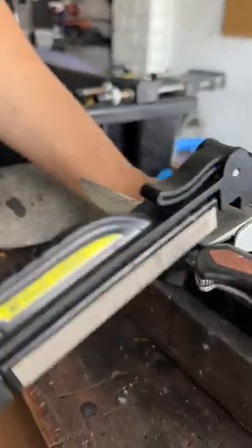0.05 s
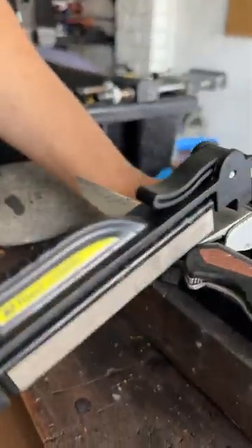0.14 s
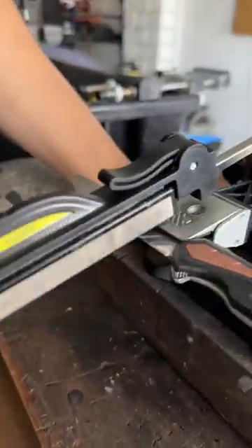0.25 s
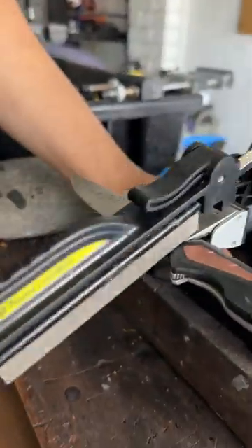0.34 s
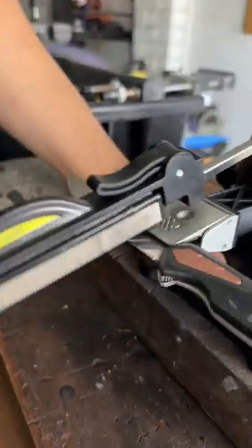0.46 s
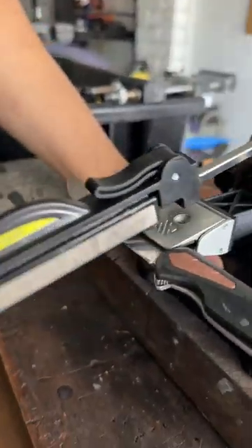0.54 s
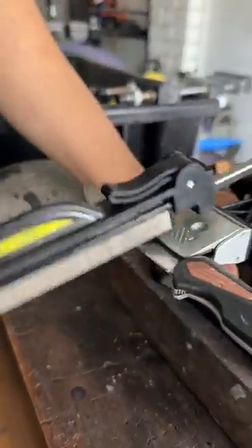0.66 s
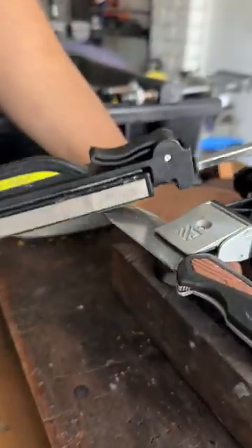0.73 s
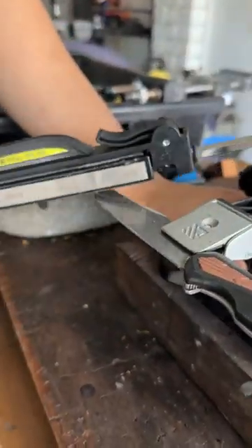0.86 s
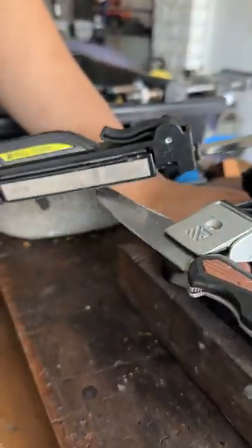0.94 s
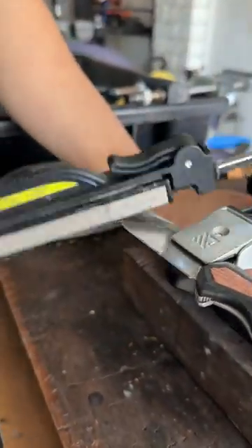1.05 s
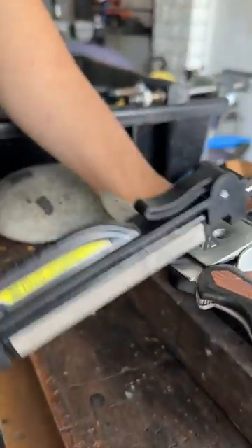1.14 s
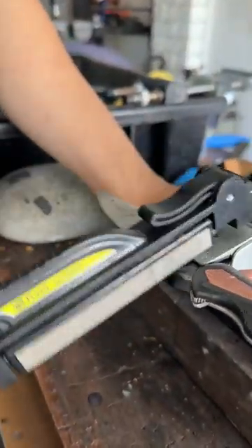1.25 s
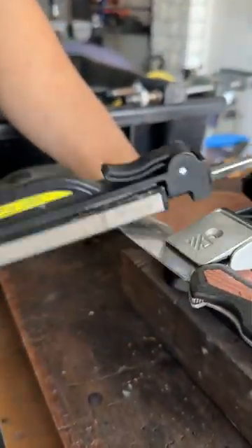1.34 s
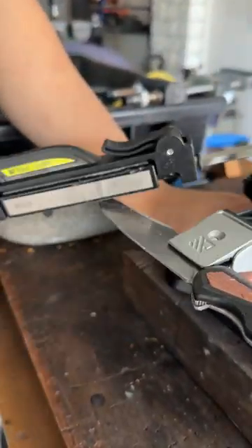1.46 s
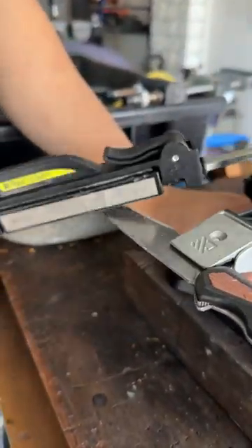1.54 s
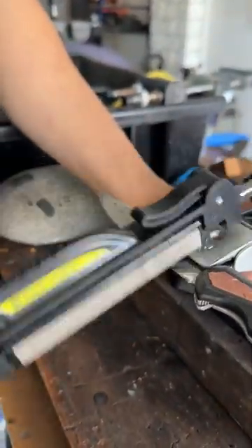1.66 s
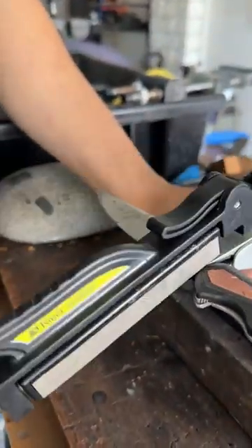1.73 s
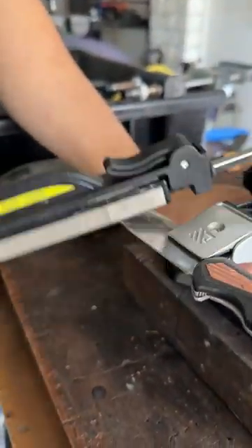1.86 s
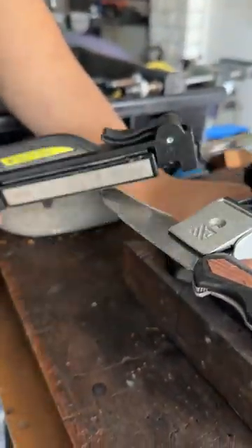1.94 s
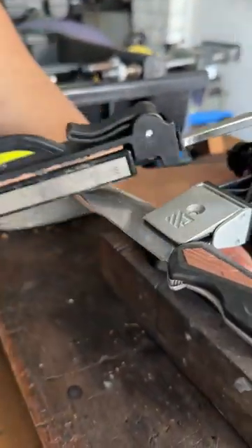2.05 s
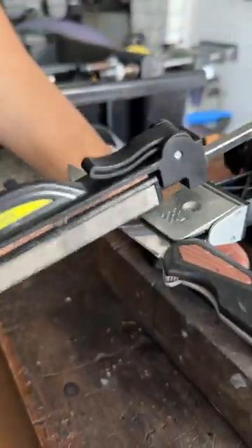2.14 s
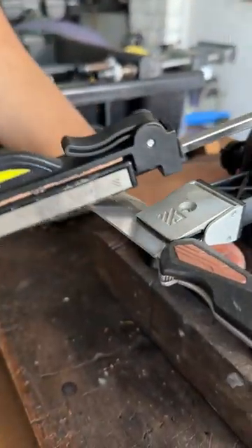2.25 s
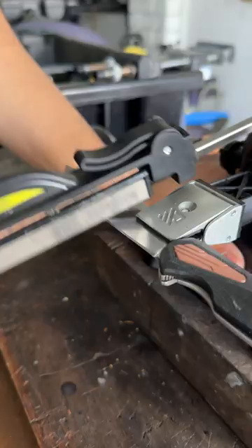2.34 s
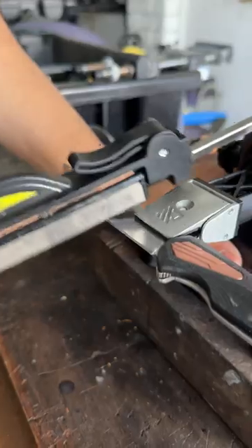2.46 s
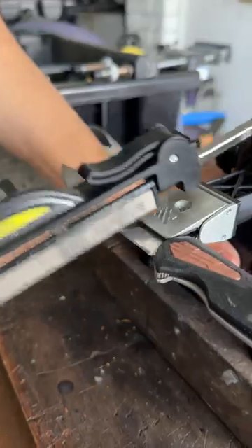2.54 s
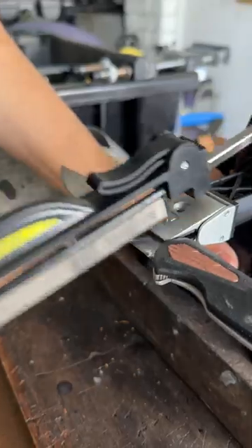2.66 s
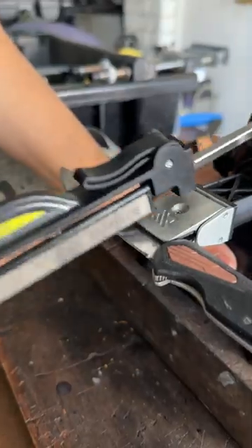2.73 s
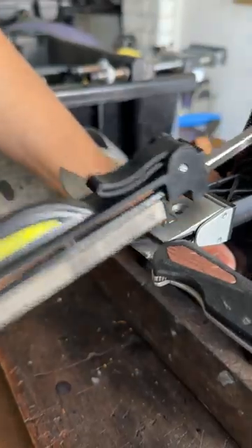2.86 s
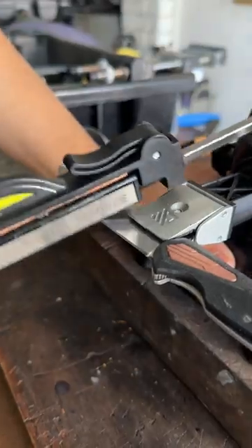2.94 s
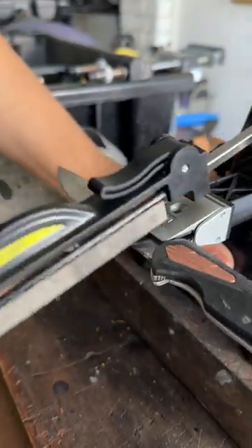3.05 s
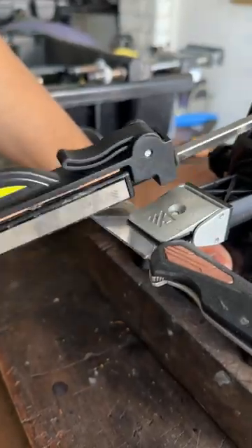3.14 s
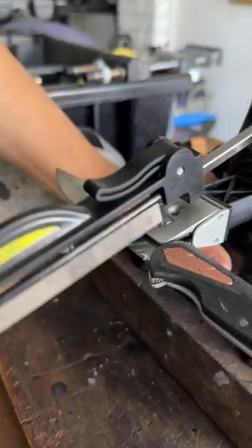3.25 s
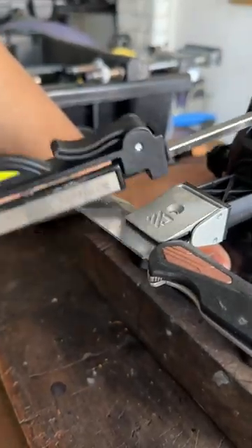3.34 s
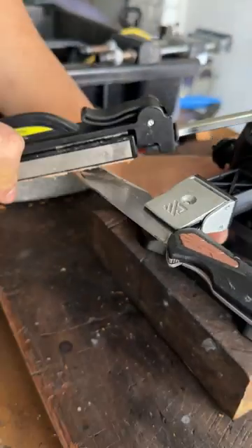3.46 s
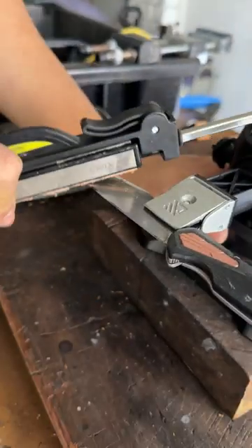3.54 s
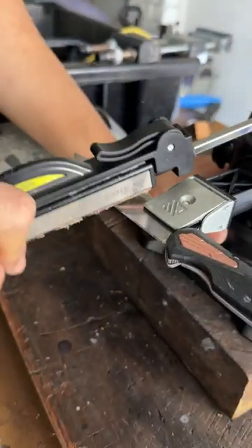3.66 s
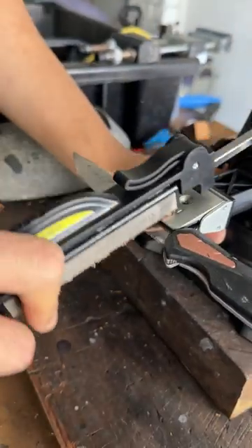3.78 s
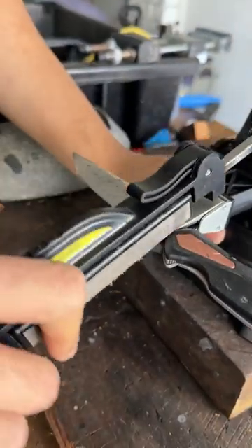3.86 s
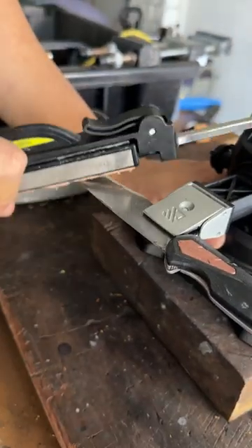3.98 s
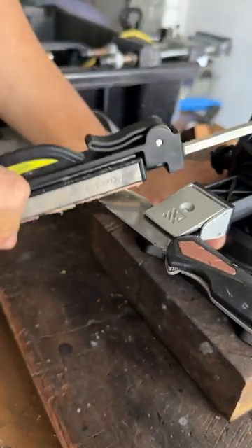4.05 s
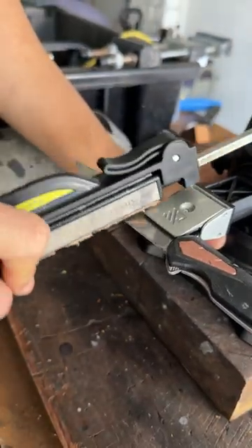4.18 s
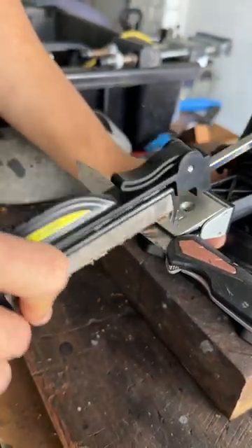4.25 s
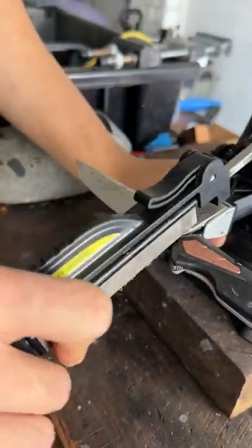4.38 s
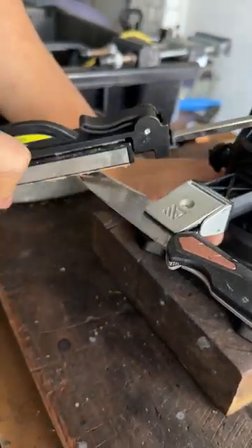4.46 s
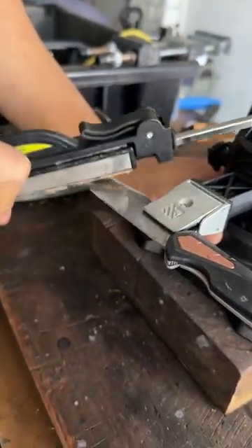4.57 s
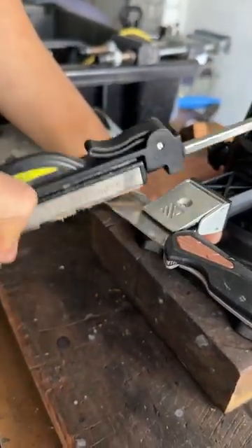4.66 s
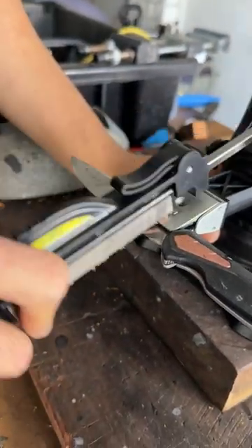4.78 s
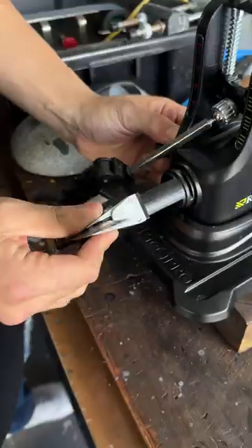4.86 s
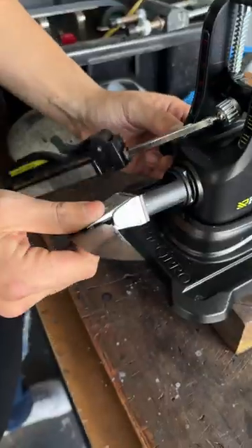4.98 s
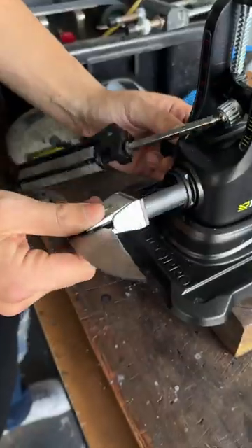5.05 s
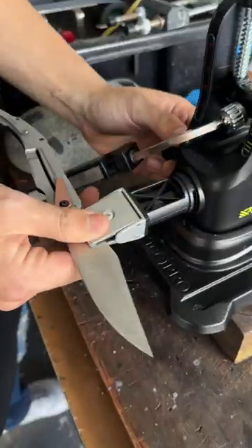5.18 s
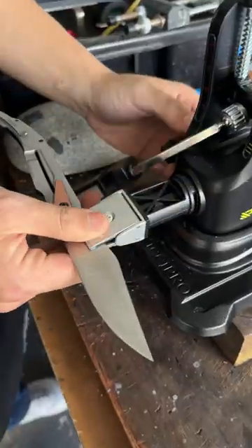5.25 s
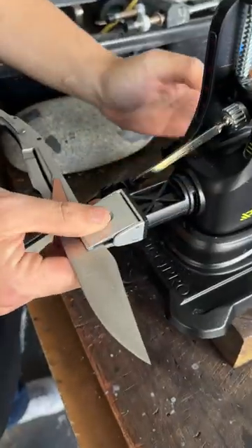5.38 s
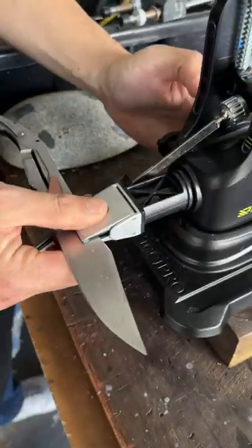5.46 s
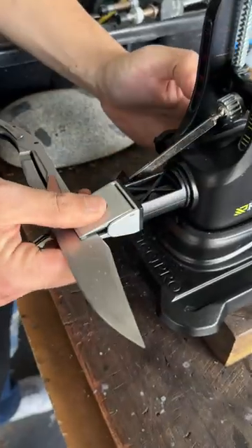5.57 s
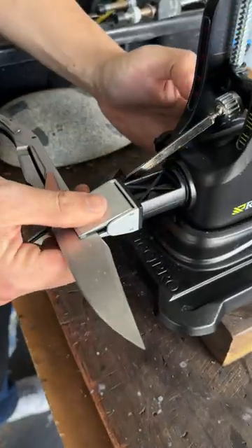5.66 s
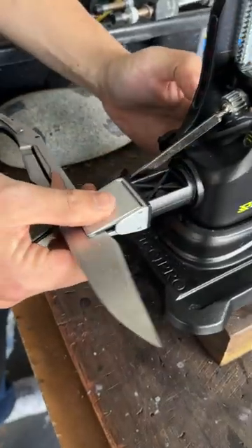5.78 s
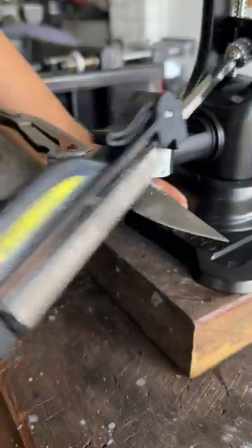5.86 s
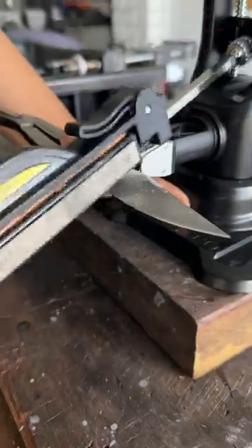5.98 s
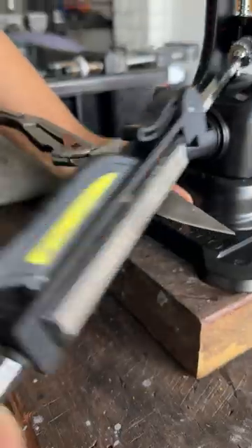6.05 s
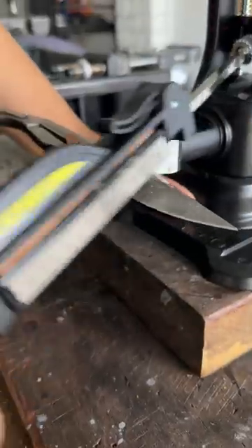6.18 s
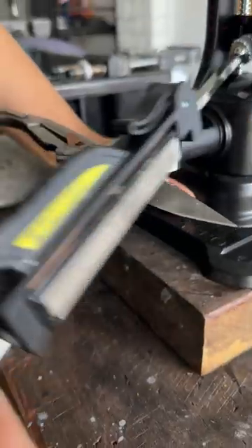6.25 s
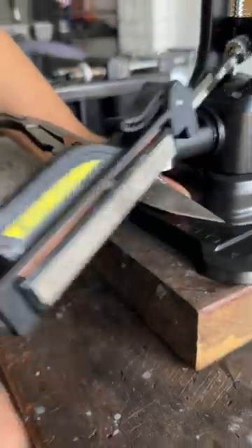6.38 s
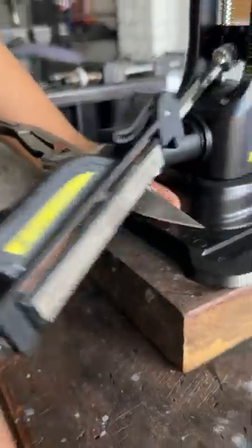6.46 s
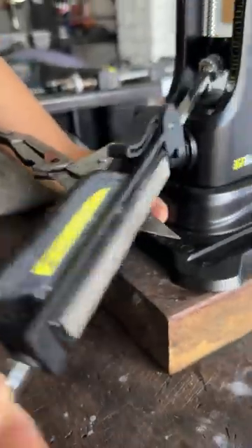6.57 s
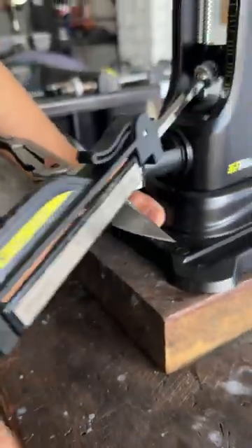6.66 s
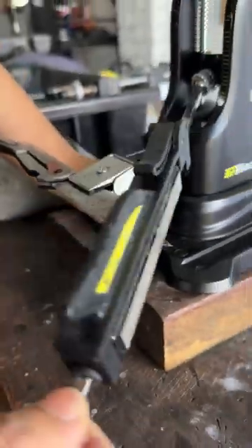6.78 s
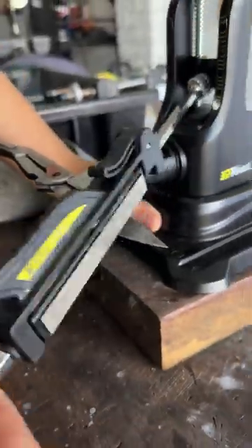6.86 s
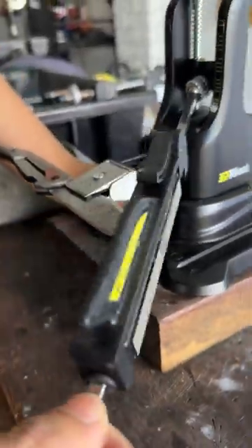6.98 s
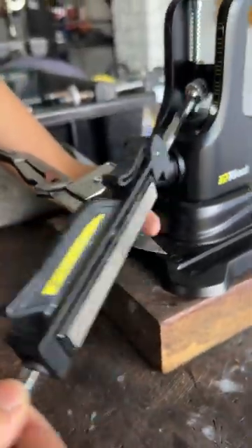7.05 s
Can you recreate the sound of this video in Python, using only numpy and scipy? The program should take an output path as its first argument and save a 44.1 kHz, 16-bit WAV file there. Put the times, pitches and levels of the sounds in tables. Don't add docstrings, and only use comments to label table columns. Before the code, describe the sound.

Close, dry stereo sound at a workshop bench, in short abruptly joined shots. From 0 to 0.65 s, short gritty strokes of a stone on a clamped blade, with hollow knocks near 0.4 s. From 0.67 to 1.98 s, longer, slower sweeps hiss and dip at each turn, with faint bumps. From 2.0 to 3.44 s, strokes quicken to about nine per second, with hard plastic-and-steel knocks and dull bench thumps. From 3.47 to 4.85 s scraping stops; a low engine hums outside, swelling at the end, with isolated knocks at 3.9 and 4.4 s. At 4.85 s it turns far louder: the clamp rattles, clicks and slides, strongest around 5.1 s, then squeaks at 5.5 s and snaps at 5.6 s, ringing the steel briefly before settling. From 5.87 to about 7.1 s, brisk scraping resumes with sharp knocks around 6.0 to 6.5 s, then gets softer.

```python
import sys
import numpy as np
from scipy import signal
from scipy.fft import rfft, irfft
from scipy.io import wavfile

SR = 44100
rng = np.random.default_rng(int(sys.argv[2]) if len(sys.argv) > 2 else 0)


def gain_from_decibels(decibels):
    exponent = np.asarray(decibels, float) / 20
    return 10 ** exponent


def pcm_store(signal):
    levels = np.round(np.clip(np.atleast_2d(signal), -1, 1) * 32767)
    wavfile.write(sys.argv[1], SR, levels.astype(np.int16).T)


N = 313551
T = np.arange(N) / SR


def rms_one(x):
    return x / np.sqrt(np.mean(x ** 2) + 1e-20)


def in_time(tables):
    s, *columns = np.concatenate(tables).T
    active = sum((T > rows[0][0] - .01) & (T < rows[-1][0] + .01) for rows in tables) > 0
    return active, [np.interp(T, s, c) for c in columns]


def over_hz(points):
    hz, value = np.transpose(points)
    return np.interp(np.log(np.fft.rfftfreq(N, 1 / SR) + 1), np.log(hz + 1), value)


def coloured(x, spectrum):
    return irfft(rfft(x) * gain_from_decibels(over_hz(spectrum)), N)


def drift(hz):
    r = np.exp(-100 * np.pi * hz / SR)
    noise = rng.standard_normal(N // 50 + 900)
    slow = rms_one(signal.lfilter([1], [1, -2 * r, r * r], noise)[898:])
    return np.interp(np.arange(N) / 50, np.arange(len(slow)), slow)


def resonate(x, peaks, patchy_db=0):
    out = 0
    for k, (hz, width_hz, db) in enumerate(peaks):
        r = np.exp(-np.pi * width_hz / SR)
        a = [1, -2 * r * np.cos(2 * np.pi * hz / SR), r * r]
        gain = gain_from_decibels(db + patchy_db * drift(5.8)) if patchy_db else gain_from_decibels(db)
        out = out + (-1) ** k * gain * signal.lfilter([(1 - r * r) / 2, 0, (r * r - 1) / 2], a, x)
    return out


def strike(times, blows_db, modes, scatter_db):
    at, out = (np.asarray(times) * SR).astype(int), np.zeros(N)
    chance = rng.standard_normal((len(at), len(modes)))
    for (hz, db, t60), own in zip(modes, chance.T):
        impulses = np.full(N, 1e-18)
        impulses[at] = gain_from_decibels(blows_db + db + scatter_db * own)
        r, w = gain_from_decibels(-60 / (t60 * SR)), 2 * np.pi * hz / SR
        out += signal.lfilter([0, np.sin(w)], [1, -2 * r * np.cos(w), r * r], impulses)
    return out


def grains(per_s, spread_db):
    sizes = gain_from_decibels(spread_db * np.minimum(rng.exponential(1, N), 5)) * rng.choice([-1, 1], N)
    return sizes * (rng.random(N) < per_s / SR)


def swells(start, hold, top_db, rise, fall):
    start, hold, top_db, fall = [np.reshape(v, (-1, 1)) for v in (start, hold, top_db, fall)]
    late = T - start
    loss = np.maximum(-rise * late, 0) + fall * np.maximum(late - hold, 0)
    return np.max(top_db - loss, axis=0)


def wander(x, share, hz):
    return np.interp(np.cumsum(1 + share * drift(hz)) % (N - 1), np.arange(N), x)


def friction(controls, spectrum, ringing, sizzling, body, per_s, spread_db, ring_db, judder_db, body_patchy_db):
    active, (hiss_db, body_db, sizzle_db) = controls
    grit = grains(per_s, spread_db) * gain_from_decibels(judder_db * drift(36.0))
    ring = rms_one(wander(resonate(grit, ringing, patchy_db=4.0), share=.02, hz=5.0))
    hiss = rms_one(rms_one(coloured(grit, spectrum)) + gain_from_decibels(ring_db) * ring)
    sizzle = rms_one(resonate(grit, sizzling, patchy_db=4.0))
    drone = rms_one(resonate(grit, body, patchy_db=body_patchy_db))
    return active * (gain_from_decibels(hiss_db) * (hiss + gain_from_decibels(sizzle_db) * sizzle) + gain_from_decibels(body_db) * drone)


def chatter(s, level_db, length_s, softness):
    kicks, lead = np.full(N, 1e-18), SR // 40
    kicks[(s * SR).astype(int)] = gain_from_decibels(level_db)
    lag = np.arange(-lead, SR // 25) / (length_s * SR)
    late = np.maximum(lag, 0)
    scuff = gain_from_decibels(-14.0) * np.exp(-np.abs(lag) / np.where(lag < 0, 2.5, .7))
    envelope = signal.oaconvolve(kicks, (late * np.exp(1 - late)) ** softness + scuff)
    return envelope[lead:N + lead] * rng.standard_normal(N)


# frequency in Hz, level in dB, t60 in s.
KNOCK_THUD = [(83.4, -3, 0.15), (173.7, -3, 0.15), (221.3, -2.5, 0.1)]


def blows(table, body, crack, crack_gain_db, chatter_s, softness, hollow):
    s, body_db, clack_db, crack_db, thud_db = np.transpose(table)
    plastic = [mode for mode in crack if mode[0] < 3200]
    steel = [mode for mode in crack if mode[0] > 3200]
    slow = chatter(s - 0.74 * chatter_s, clack_db + crack_gain_db, 1.56 * chatter_s, softness)
    fast = chatter(s - 1.4 * chatter_s, crack_db + crack_gain_db, chatter_s, softness)
    knock = strike(s - .001, body_db, body, scatter_db=2.5)
    knock = resonate(resonate(knock, [hollow]), [hollow])
    thud = signal.lfilter([.1], [1, -.9], strike(s + 0.00396, thud_db, KNOCK_THUD, scatter_db=4.0))
    return resonate(slow, plastic, patchy_db=-0.5) + resonate(fast, steel) + knock + thud


# start in s, end in s, workshop air in dB, distant rumble in dB.
SHOTS = [
    (-.01, .646, -62, -59),
    (0.664, 1.976, -61, -63.5),
    (2.001, 3.443, -63, -55.5),
    (3.467, 3.914, -65, -59.5),
    (3.931, 4.447, -66.5, -59.5),
    (4.465, 4.845, -63.5, -57.5),
    (4.843, 5.483, -42, -43),
    (5.474, 5.846, -42, -43),
    (5.87, 7.2, -60, -67),
]
FADE_IN_S, FADE_OUT_S = 0.015, 0.0068


def shots():
    fade, levels = np.zeros(N), np.zeros((2, N))
    for start, end, *levels_db in SHOTS:
        ramp = np.clip(np.minimum((T - start) / FADE_IN_S, (end - T) / FADE_OUT_S), 0, 1) ** 2
        fade += ramp
        levels += np.multiply.outer(gain_from_decibels(np.array(levels_db)), ramp > 0)
    return fade, levels


def turning_shot():
    return (T > SHOTS[6][0]) & (T < SHOTS[7][1])


# frequency in Hz, level in dB per Hz.
AIR = [(180, -12), (300, -4.5), (354, -14), (584, -8), (1190, -20), (2100, -10.5), (2650, -21),
       (5080, -28.5), (9240, -23.5), (10600, -29.5), (11700, -59), (12500, -57), (13300, -25), (16000, -28)]


def workshop_air():
    mid, side = (rms_one(coloured(rng.standard_normal(N), AIR)) for part in range(2))
    side = signal.lfilter([1, -1], [1, -.9], side)
    return gain_from_decibels(1.4 * drift(3.5)) * (mid + side * np.array([[1], [-1]]))


# frequency in Hz, width in Hz, level in dB.
BENCH = [(46.7, 26, 2.5), (81, 44, 2), (143.4, 15.4, 0), (208.8, 24.4, -4.5)]


def rumble():
    return rms_one(resonate(rng.standard_normal(N) * gain_from_decibels(3.1 * drift(3.5)), BENCH))


# turn in s, grit hiss in dB, dip at the turn in dB.
SHORT_STROKES = [
    (0.0, -52.5, 2),
    (0.161, -52.5, -49),
    (0.294, -51, -31),
    (0.405, -50.5, -77),
    (0.554, -53, -21),
    (0.646, -34, -6),
]
LONG_STROKES = [
    (0.671, -39.5, -12),
    (0.788, -49, -8),
    (0.979, -48, -21),
    (1.262, -46.5, -21),
    (1.526, -47, -24),
    (1.785, -47, -24),
    (1.974, -42, -3),
]
QUICK_STROKES = [(2.009, -40, 1.5), (2.092, -42, -1.5), (2.219, -44, -20.5), (2.328, -46.5, -12),
                 (2.449, -45, -45), (2.544, -47, -9), (2.657, -48.5, -15), (2.764, -47.5, -14),
                 (2.863, -50, -24), (2.975, -46, -10), (3.082, -46, -36), (3.195, -44.5, -17),
                 (3.298, -44.5, -27), (3.419, -40.5, -46), (3.443, -25, -1)]
BACK_STROKES = [(5.873, -44.5, 6), (5.938, -43.5, -44), (5.989, -44, -16), (6.051, -46, -15),
                (6.142, -45, -28), (6.265, -43.5, -23), (6.357, -47, -18), (6.477, -45.5, -20),
                (6.577, -49, -16), (6.691, -46.5, -17), (6.813, -49.5, -29), (6.918, -50, -13),
                (7.03, -52.5, -64), (7.11, -49.5, 2.5)]
# holder drone in dB on the push, on the pull, fastest point 0-1, bench shake in dB,
# sizzle over hiss in dB.
GRIPS = [
    (-53.5, -52.5, 0.48, -69, -11.5),
    (-51.5, -51.5, 0.53, -58, -5.5),
    (-54, -51, 0.42, -53.5, -4.5),
    (-50, -52.5, 0.47, -53, -5),
]
SHAKE_FOLLOWS = 0.52


def strokes(swell):
    active, curves = np.zeros(N, bool), np.full((4, N), -90.)
    runs = (SHORT_STROKES, LONG_STROKES, QUICK_STROKES, BACK_STROKES)
    for run, (*drone_db, fastest, shake_db, sizzle_db) in zip(runs, GRIPS):
        for k, ((start, hiss_db, turn_db), (end, next_db, next_turn_db)) in enumerate(zip(run, run[1:])):
            now = (T >= start) & (T < end)
            share = (T[now] - start) / (end - start)
            before = np.clip(1 - share / fastest, 0, 1) ** swell
            after = np.clip((share - fastest) / (1 - fastest), 0, 1) ** swell
            dip = turn_db * before + (next_db + next_turn_db - hiss_db) * after
            curves[0, now] = hiss_db + dip
            curves[1, now] = drone_db[k % 2] + 0.58 * dip
            curves[2, now] = sizzle_db + 0.41 * dip
            curves[3, now] = shake_db + SHAKE_FOLLOWS * dip
            active |= now
    return (active, curves[:3]), curves[3]


# frequency in Hz, level in dB per Hz.
GRIT = [(710, -8), (1200, -29), (1530, -3.5), (3560, 2), (3850, -7.5), (4510, -11), (5300, -4), (7960, 10),
        (8870, 1), (9980, 10.5), (11900, -19.5), (12500, -59), (16200, -55), (22000, -120)]
# frequency in Hz, width in Hz, level in dB.
BLADE = [(1445, 73, 3.5), (1980, 770, -0.5), (2750, 190, 5), (3866, 102, 8.5), (5520, 190, 1),
         (6560, 430, 5), (7290, 550, 7), (8200, 650, 5.5), (9680, 230, 8.5)]
SIZZLE = [(11100, 1600, -3.5), (12700, 710, -29), (13300, 970, -3.5), (15360, 800, 1.5)]
HOLDER = [(317, 71, -13), (506, 220, 2), (635, 70, 5.5), (726, 54, 1.5), (892, 377, -4)]


def stone(rubbing):
    return friction(rubbing, GRIT, BLADE, SIZZLE, HOLDER, per_s=15000.0, spread_db=1.0,
                    ring_db=-1.5, judder_db=2.0, body_patchy_db=4.5)


# time in s, rumble in dB, decay in dB per s.
JOLTS = [(.28, -51, 500), (.434, -47.5, 121), (.74, -43.5, 161), (2.024, -46.5, 56), (2.314, -50, 150),
         (4.502, -42.5, 213), (4.905, -31.5, 200), (4.96, -36, 200), (5.02, -32, 200), (5.15, -35, 300),
         (5.234, -22.5, 500), (5.3, -24, 296), (5.455, -29.5, 597), (5.51, -27, 300), (5.8, -34, 200),
         (5.554, -34.5, 109), (5.84, -28, 799), (6.056, -43.5, 396), (6.262, -40.5, 404)]
JOLT_RISE_DB_PER_S, TURNING_SHAKE_DB = 215, -37.5


def shake(stroke_db):
    s, db, fall = np.transpose(JOLTS)
    jolt_db = swells(s, 0, db, JOLT_RISE_DB_PER_S, fall)
    return (gain_from_decibels(np.maximum(jolt_db, stroke_db)) + turning_shot() * gain_from_decibels(TURNING_SHAKE_DB)) * rumble()


# time in s, peak in dB, clack in dB, crack in dB.
KNOCKS = [(0.371, -31.5, -40.5, -35), (0.421, -33.5, -47, -53), (0.639, -41, -39, -53),
          (1.747, -39.5, -51, -58), (2.077, -38, -37, -39), (2.107, -52, -49, -36),
          (2.298, -30.5, -32, -30), (2.517, -29, -30.5, -34), (2.643, -28, -42, -45),
          (2.736, -28.5, -30, -27), (2.851, -27.5, -39.5, -47), (2.934, -32.5, -29.5, -27.5),
          (3.024, -41, -45, -44), (3.161, -39.5, -35.5, -33.5), (3.331, -36.5, -42.5, -58),
          (3.379, -34, -30.5, -23), (3.534, -63, -55, -71), (3.9, -22.5, -37.5, -46.5),
          (4.157, -60, -63, -59), (4.235, -75, -72, -61.5), (4.392, -26.5, -38, -44),
          (4.496, -50.5, -55, -63), (5.945, -44.5, -50, -40), (5.975, -49, -44, -43),
          (6.011, -48, -50, -34), (6.03, -53, -41, -31.5), (6.149, -61, -44.5, -44), (6.183, -40, -49, -51),
          (6.242, -44, -36, -27.5), (6.461, -41, -36.5, -32), (7.041, -66, -53, -64)]
BUMPS = [(0.309, -50, -67, -56), (0.685, -46, -47, -66), (0.863, -53, -45, -55), (0.998, -44, -54, -60),
         (1.024, -48, -46.5, -52), (1.325, -65, -60, -43.5), (1.536, -65, -54, -52), (1.806, -52, -59, -67),
         (2.017, -46.5, -56, -55), (2.053, -41, -41, -56), (2.134, -40.5, -37.5, -48),
         (2.177, -49, -55, -58)]
# frequency in Hz, level in dB, t60 in s.
KNOCK_BODY = [(367, -6, 0.037), (570, -9.5, 0.05), (640, -10, 0.019), (726, -15, 0.011),
              (900, -11.5, 0.016)]
STOP_PLATE = [(1123, -5, 0.022), (1562, 2.5, 0.018), (1780, -0.5, 0.011), (2430, -3, .02),
              (2570, -22, 0.012)]
# frequency in Hz, width in Hz, level in dB.
KNOCK_CRACK = [(934, 194, 2.5), (1601, 98, 4), (1910, 450, -4.5), (2610, 180, -1), (3100, 620, -4.5),
               (3850, 174, 1), (4660, 740, -9.5), (5740, 710, -4), (7600, 2200, -5.5), (10300, 6600, -14)]
THUD_DB, THUD_FOLLOWS = -15, 0.78


def knocks():
    stops = [(*knock, THUD_DB + THUD_FOLLOWS * knock[2]) for knock in KNOCKS + BUMPS]
    hits = blows(stops, KNOCK_BODY, KNOCK_CRACK, crack_gain_db=11.0, chatter_s=0.0021, softness=2.3,
                 hollow=(630, 320, 6.0))
    s, _, clack_db, _ = np.transpose(KNOCKS)
    plate = strike(s + 0.001045, clack_db - 4, STOP_PLATE, scatter_db=-2.5)
    return hits + signal.lfilter([.3], [1, -.7], plate)


# time in s, peak in dB.
THUMPS = [
    (0.371, -47),
    (2.297, -36),
    (2.514, -40),
    (2.736, -33),
    (2.938, -39),
    (3.161, -42),
    (3.377, -34),
    (6.028, -43),
    (6.242, -29),
    (6.462, -35),
]
# frequency in Hz, level in dB, t60 in s.
THUMP = [(110, -7, 0.054), (158, -3, 0.034), (282, 2, 0.039)]


def thumps():
    s, db = np.transpose(THUMPS)
    return signal.lfilter([.1], [1, -.9], strike(s + .005, db - 7, THUMP, scatter_db=1.0))


# start in s, end in s, firing rate in Hz at start, at end, swell in dB.
ENGINE = [
    (3.468, 3.91, 63.6, 64.3, -6),
    (3.918, 4.44, 63.9, 64, -1),
    (4.47, 4.842, 64.7, 66.5, 16),
]
# level in dB of orders 2, 3, 4, 5 at mid shot.
ENGINE_ORDERS = [
    (-58.5, -58.5, -71.5, -73.5),
    (-55, -70, -71.5, -85),
    (-59.5, -65, -75, -96),
]
# time in s, frequency in Hz, level in dB.
DRONE = [
    (3.47, 56.9, -42),
    (3.9, 60.8, -48.5),
    (3.95, 59.4, -48),
    (4.2, 58.8, -56),
    (4.44, 61.2, -55),
    (4.83, 60.1, -77),
]


def engine():
    tables = []
    for (start, end, hz, end_hz, swell_db), orders_db in zip(ENGINE, ENGINE_ORDERS):
        tables.append([(start, hz, *np.add(orders_db, -swell_db / 2)),
                       (end, end_hz, *np.add(orders_db, swell_db / 2))])
    active, (hz, *orders_db) = in_time(tables)
    phase = 2 * np.pi * np.cumsum(hz) / SR
    orders = sum(gain_from_decibels(db + 0.27 * drift(4.9)) * np.sin((k + 2) * phase + k) for k, db in enumerate(orders_db))
    drone_hz, drone_db = in_time([DRONE])[1]
    drone = gain_from_decibels(drone_db + 1.9 * drift(5.4)) * np.sin(2 * np.pi * np.cumsum(drone_hz) / SR)
    return active * np.sqrt(2) * (orders + drone)


# low edge in Hz, high edge in Hz.
DULL_BAND_HZ = [10500, 13500]


def dulled(x):
    return signal.sosfilt(signal.cheby2(6, 65, DULL_BAND_HZ, "bandstop", fs=SR, output="sos"), x)


# time in s, peak in dB, clack in dB, crack in dB, bench thud in dB.
CLICKS = [(4.862, -25.5, -27.5, -78, -30), (4.897, -20, -22, -43, -34), (4.918, -8, -19, -24.5, -32),
          (5.08, -2.5, -22, -16, -24.5), (5.065, -17.5, -42, -37, -30), (5.072, -18, -31, -34, -53),
          (5.118, -12, -24, -42, -36), (5.094, -16, -13.5, -32, -38), (5.107, -18, -11, -35, -25),
          (5.126, -15.5, -29, -17, -41), (5.289, -14.5, -11.5, -50, -25), (5.195, -32, -41, -54, -40),
          (5.351, -50, -10.5, -18.5, -38), (5.364, -44, -20, -25.5, -28.5), (5.585, -32, -39, -25, -29),
          (5.592, -45, -23, -23, -39), (5.598, -47, -39, -23, -40), (5.604, -17.5, -13, -35, -31)]
# frequency in Hz, level in dB, t60 in s.
CLICK_BODY = [(786, -6, 0.023), (914, -19, 0.042), (1140, -16, 0.1)]
# frequency in Hz, width in Hz, level in dB.
CLICK_CRACK = [(1400, 920, 5), (1830, 740, 5.5), (2580, 190, -1), (3730, 174, 10.5), (4470, 560, -11),
               (5870, 1000, 4), (8300, 3500, -8), (9900, 1800, -8), (12900, 1200, -27), (14000, 1400, -3)]


def clicks():
    return blows(CLICKS, CLICK_BODY, CLICK_CRACK, crack_gain_db=4.5, chatter_s=0.0014, softness=0.86,
                 hollow=(830, 200, 6.0))


# start in s, hold in s, level in dB, decay in dB per s.
RUBS = [(4.868, .03, -41, 200), (4.952, .01, -34.5, 250), (4.993, 0.022, -39, 200), (5.05, .01, -37, 200),
        (5.15, .01, -44, 200), (5.19, .04, -44, 200), (5.357, 0.066, -38, 300), (5.503, 0.039, -36, 200),
        (5.784, 0.046, -41, 300)]
# frequency in Hz, width in Hz, level in dB.
CASING = [(1710, 300, -3.5), (2060, 330, 1), (2410, 390, -8)]


def palms():
    s, hold, db, fall = np.transpose(RUBS)
    rustle = resonate(resonate(grains(3000.0, 2.3), CASING, patchy_db=4.0), [(2000, 730, 0)])
    return turning_shot() * gain_from_decibels(swells(s, hold, db, 350, fall)) * rms_one(rustle)


# time in s, level in dB, build-up in s.
CATCHES = [(4.898, -27, .002), (4.921, -35, 0.0024), (5.084, -20, 0.011), (5.125, -8.5, 0.0011),
           (5.131, -29, .001), (5.2905, -47, 0.00082), (5.302, -54, 0.0018), (5.3538, -20, 0.001),
           (5.365, -31, 0.0034), (5.47, -33.5, 0.014), (5.593, -8, 0.0037), (5.6021, -5, 0.0024),
           (5.606, -11, 0.0011)]
# frequency in Hz, width in Hz, level in dB.
CATCH = [(2510, 350, 1), (4000, 320, 1.5), (5300, 1740, 2.5), (7040, 2100, 1), (9730, 680, 6.5),
         (10960, 3600, 0.5), (14300, 5600, -1.5)]
CATCH_RELEASE_S = 0.0014


def catches():
    envelope = np.zeros(N)
    for s, db, build in CATCHES:
        near = slice(int((s - .06) * SR), int((s + .01) * SR))
        late = T[near] - s
        envelope[near] += gain_from_decibels(db) * np.exp(np.minimum(late / build, -late / CATCH_RELEASE_S))
    return envelope * rms_one(resonate(rng.standard_normal(N), CATCH))


# start in s, hold in s, rattle in dB, housing in dB, decay in dB per s.
SLIDES = [(4.903, 0.031, -37.5, -26, 448), (5.002, 0.044, -42, -31, 500), (5.072, 0.057, -26, -22, 700),
          (5.14, 0.11, -79, -35.5, 300), (5.293, 0.0018, -44, -27.5, 380), (5.375, 0.0012, -46, -31, 600),
          (5.465, 0.0063, -35, -39, 901), (5.5, 0.079, -46, -38, 301), (5.604, 0.011, -24, -29, 181),
          (5.67, 0.12, -35, -41, 203), (5.784, 0.049, -29.5, -30, 455)]
SLIDE_RISE_DB_PER_S, RATTLE_REST_DB, HOUSING_REST_DB = 482, -67, -46
SIZZLE_DB, SIZZLE_DULLING, SIZZLE_FALL_DB_PER_S, SIZZLE_REST_DB = 2, 1.2, 602, -31


def slides():
    s, hold, rattle_db, housing_db, fall = np.transpose(SLIDES)
    rattle = np.maximum(swells(s, hold, rattle_db, SLIDE_RISE_DB_PER_S, fall), RATTLE_REST_DB)
    housing = np.maximum(swells(s, hold, housing_db, SLIDE_RISE_DB_PER_S, fall), HOUSING_REST_DB)
    bright_db = SIZZLE_DB - SIZZLE_DULLING * (housing_db - rattle_db)
    bright_db = bright_db - 25 * (hold > .07)
    sizzle = swells(s, hold, bright_db, SLIDE_RISE_DB_PER_S, SIZZLE_FALL_DB_PER_S)
    return turning_shot(), [rattle, housing, np.maximum(sizzle, SIZZLE_REST_DB)]


# frequency in Hz, level in dB per Hz.
RATTLE = [(710, -32), (1200, -7), (2590, 9), (3060, -21), (3650, 14.5), (5050, -23), (5640, 4), (8970, 8),
          (9660, -22), (11000, -37), (14300, -55), (22000, -120)]
# frequency in Hz, width in Hz, level in dB.
CLAMP = [(2020, 1600, 43), (2500, 220, -14), (3660, 120, -9), (4870, 100, -8), (6300, 300, 19),
         (7500, 300, -30.5), (9730, 100, -22)]
CLAMP_SIZZLE = [(13500, 660, 0), (14200, 800, -3)]
HOUSING = [(473, 200, -2), (699, 53, 3), (850, 64, 5), (960, 47, -11), (970, 77, -2.5)]


def clamp():
    return friction(slides(), RATTLE, CLAMP, CLAMP_SIZZLE, HOUSING, per_s=5000.0, spread_db=1.0,
                    ring_db=2.0, judder_db=2.5, body_patchy_db=2.0)


# frequency in Hz, width in Hz, level in dB.
SEAT = [(733, 45, -5.5), (3390, 130, -14.5), (6600, 160, -20)]
SQUEAK_S, SQUEAK_HOLD_S, SQUEAK_DB = 5.505, 0.032, -29.5


def squeak():
    tone = rms_one(resonate(resonate(rng.standard_normal(N), SEAT), SEAT))
    return tone * gain_from_decibels(swells(SQUEAK_S, SQUEAK_HOLD_S, SQUEAK_DB, 680, 500))


# frequency in Hz, level in dB, t60 in s.
STEEL_RING = [(860, 10, 0.056), (1282, -2, 0.48), (1255, -25, .2), (1574, -7, 0.6), (2385, -29, 0.73),
              (2730, -12, 0.5), (2870, -16.5, 3.1), (3620, -15.5, 0.94), (6928, -29, 0.15)]
SNAP_S, SNAP_DB = 5.604, -23


def snap_ring():
    ring = strike([SNAP_S], SNAP_DB, STEEL_RING, scatter_db=-0.5)
    return ring * turning_shot() * gain_from_decibels(0.88 * drift(28))


# time in s, left-right in dB.
PLACE = [(0, -1), (.66, -2), (.68, 2), (.9, 0.5), (2.0, -2), (2.03, -1.5), (4.8, -0.5), (4.86, -0.5),
         (5.84, -0.5), (5.88, -.5), (7.11, -2)]


def place_db():
    return in_time([PLACE])[1][0] + 1.45 * drift(9.8)


def panned(x, pan_db):
    return x * gain_from_decibels(np.multiply.outer([.5, -.5], pan_db * np.ones(N)))


# frequency in Hz, left lead in radians.
PORT_PHASE = [(0, 0), (1600, .2), (2800, .9), (4000, .2), (6550, -.9), (8500, -1.9), (10200, -2.5),
              (11000, -3), (12300, -1.4), (13000, 0), (16000, 0)]
CLAMP_PHASE = [(0, 0), (4600, .2), (8600, -1.3), (10900, -2), (12500, -2.3), (12700, -4), (15000, -4.9),
               (16000, -5.4)]
# frequency in Hz, share common to both ports 0-1.
LIKENESS = [(100, 1), (300, 0.98), (700, 0.88), (1500, 0.85), (3000, 0.44), (6000, .55), (12000, 0.75)]
# frequency in Hz, left-right in dB.
PORT_TILT = [(100, 0), (3000, -1), (6000, 2.5), (10000, 2.5), (14000, 0)]


def ports(x, phase, scatter_top_hz):
    turn = np.exp(.5j * over_hz(phase)) * gain_from_decibels(over_hz(PORT_TILT) / 2)
    alike = np.clip(over_hz(LIKENESS), 0, 1)
    burst = rng.standard_normal(1600) * np.exp(-np.arange(1600) / 500.)
    scatter = rfft(rms_one(burst) / 40, N)
    scatter = scatter / (1 + (np.fft.rfftfreq(N, 1 / SR) / scatter_top_hz) ** 10)
    spread = np.sqrt((1 - alike) / 2) * scatter
    same = np.sqrt((1 + alike) / 2)
    return irfft(rfft(x) * np.array([same * turn + spread, same / turn - spread]), N)


ROOM_T60_S, ROOM_DB = 0.066, -9


def workshop(x):
    t = np.arange(SR // 4) / SR
    tail = rng.standard_normal((2, len(t))) * gain_from_decibels(-60 * t / ROOM_T60_S) * (t > .004)
    tail = signal.lfilter([1, -1], [1, -.85], tail)
    tail /= np.sqrt(np.sum(tail ** 2, axis=1, keepdims=True))
    out = np.zeros((2, N))
    for start, end, *levels in SHOTS:
        a, b = max(int(start * SR), 0), min(int(end * SR), N)
        out[:, a:b] = signal.fftconvolve(x[:, a:b], tail, axes=1)[:, :b - a]
    return gain_from_decibels(ROOM_DB) * out


def scene():
    fade, (air, low) = shots()
    background = air * workshop_air() + low * rumble() + engine()
    background = np.where(turning_shot(), dulled(background), background)
    rubbing, shake_db = strokes(swell=2.97)
    pan_db = place_db()
    sharpening = panned(stone(rubbing) + knocks() + thumps(), pan_db) + shake(shake_db)
    sliding = dulled(clamp() + palms() + squeak())
    turning = panned(sliding + clicks() + catches() + dulled(snap_ring()), pan_db)
    direct = ports(sharpening, PORT_PHASE, scatter_top_hz=18000.0)
    direct = direct + ports(turning, CLAMP_PHASE, scatter_top_hz=9050.0)
    return fade * (direct + workshop(sharpening + dulled(turning)) + background)


def roll_off(x):
    return signal.sosfilt(signal.butter(12, 16480, fs=SR, output="sos"), x)


def record(dry):
    top = signal.ellip(10, 1, 60, 15740, fs=SR, output="sos")
    mix = signal.sosfilt(top, np.clip(dry, -1, 1))
    return roll_off(mix)


dry = scene()
out = record(dry)
pcm_store(out)
```